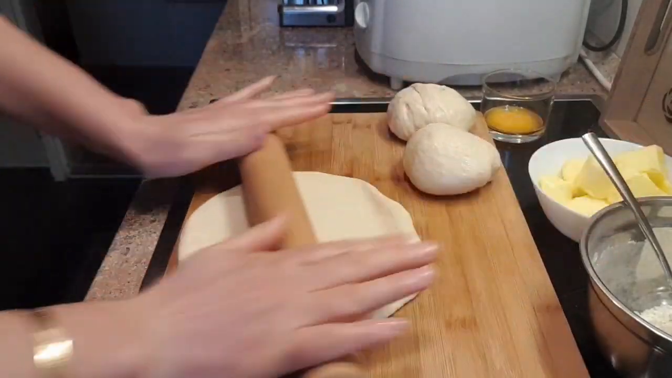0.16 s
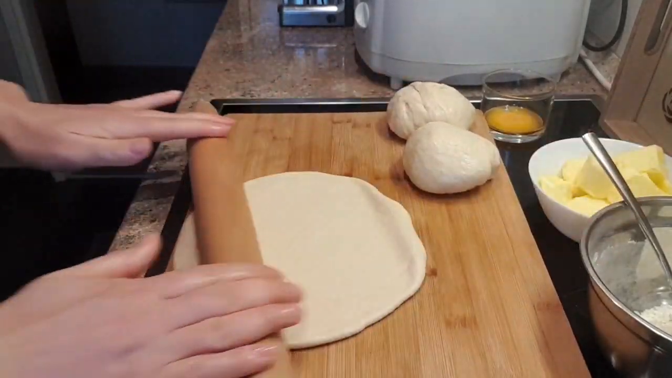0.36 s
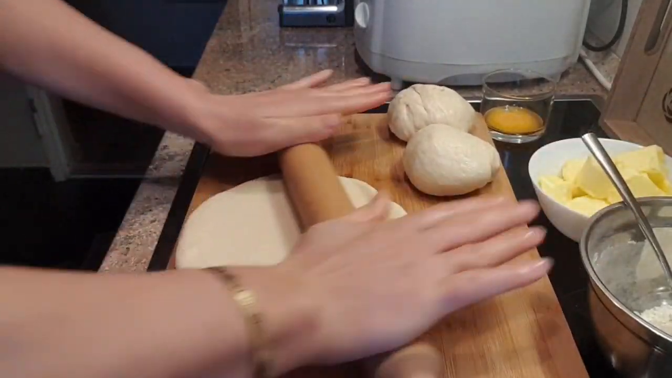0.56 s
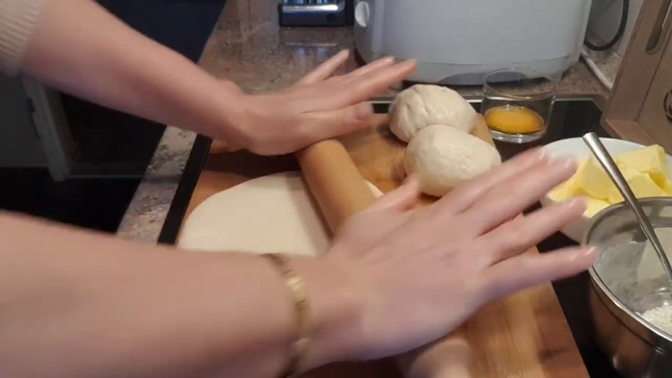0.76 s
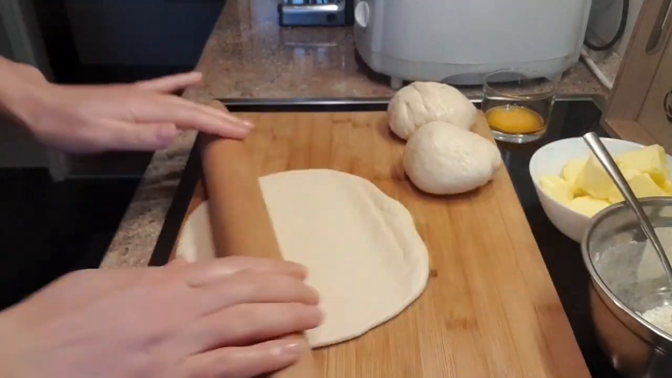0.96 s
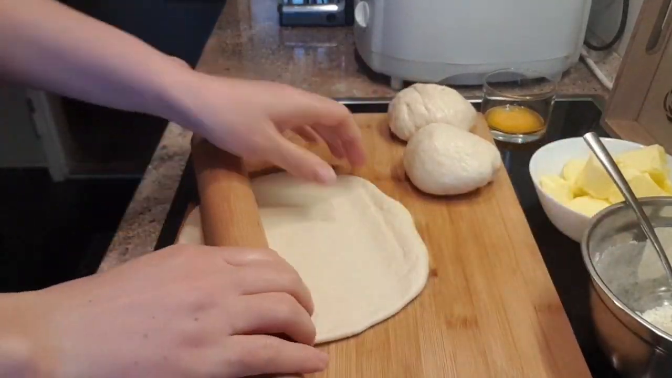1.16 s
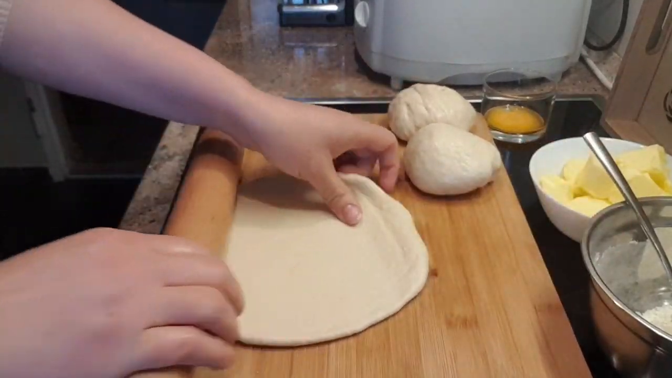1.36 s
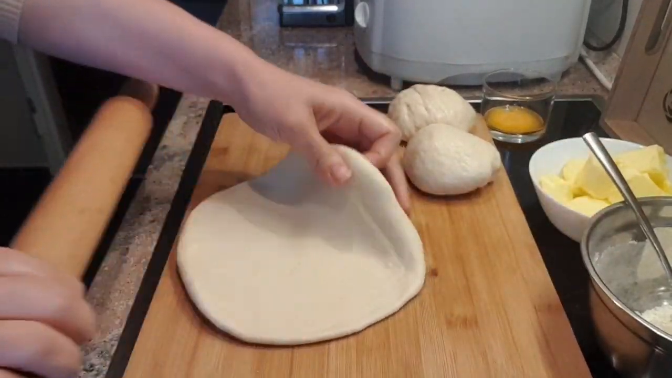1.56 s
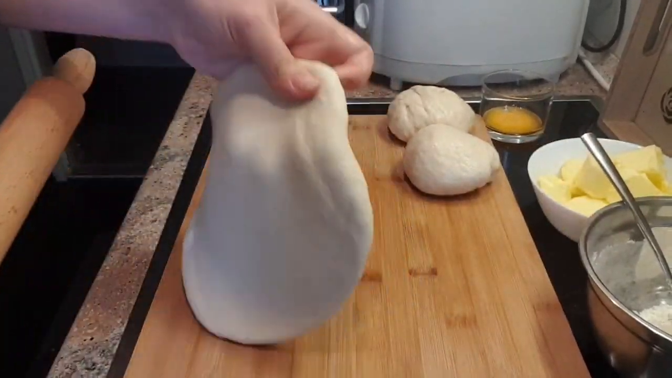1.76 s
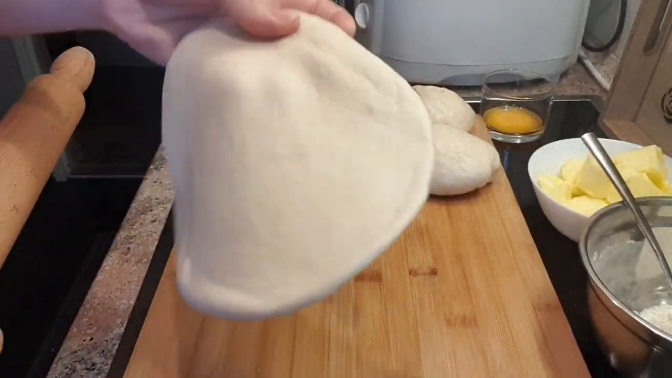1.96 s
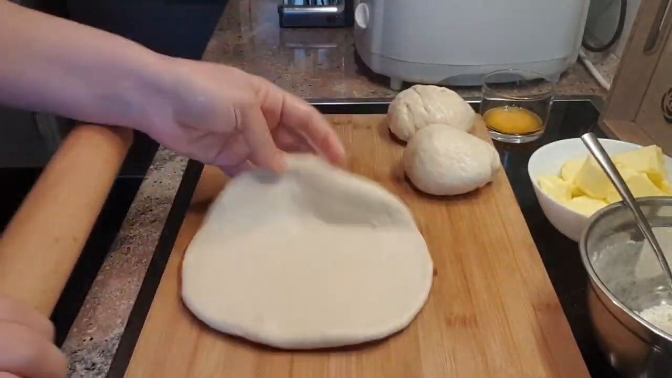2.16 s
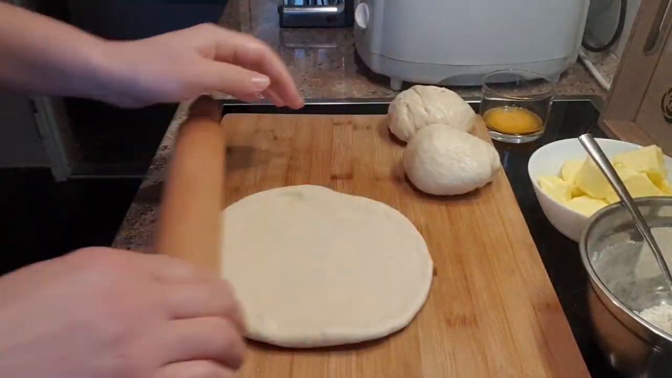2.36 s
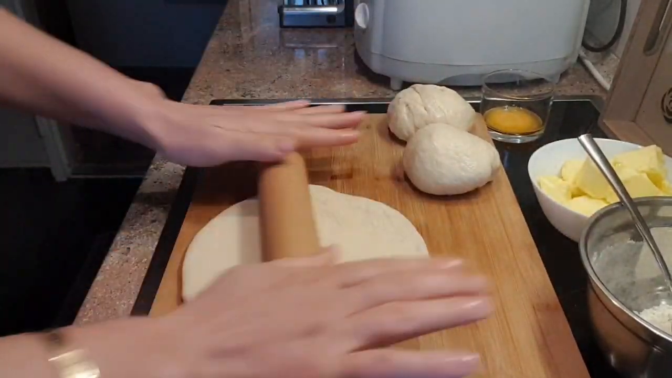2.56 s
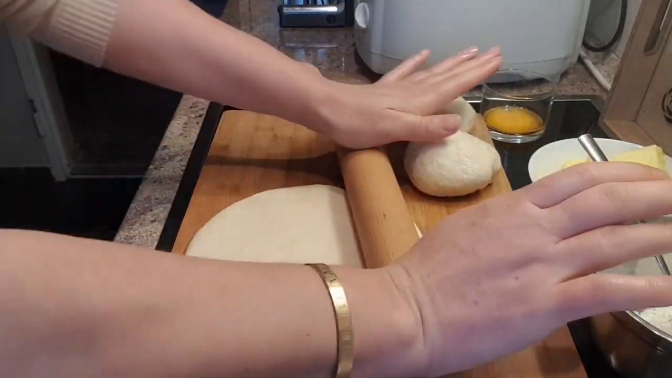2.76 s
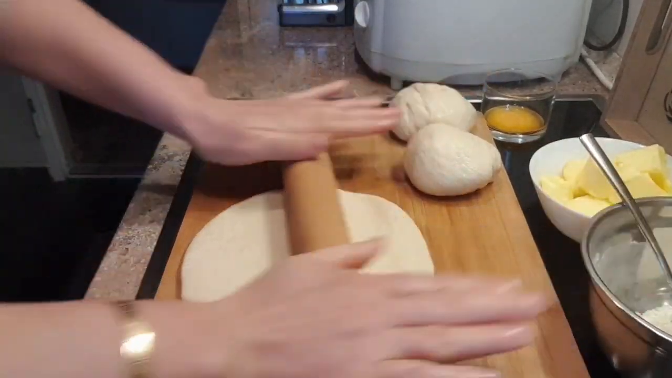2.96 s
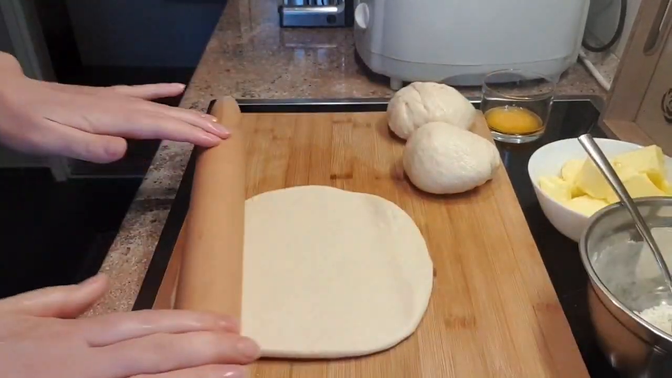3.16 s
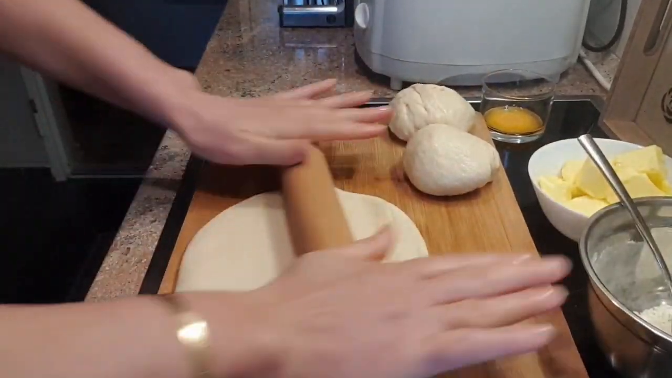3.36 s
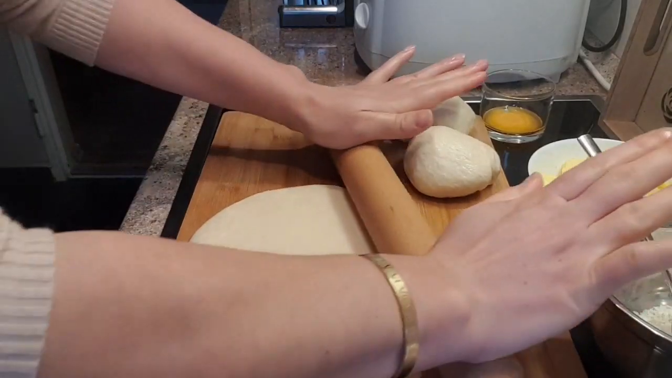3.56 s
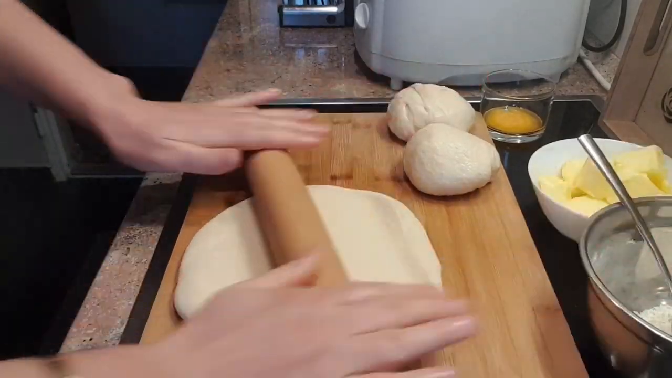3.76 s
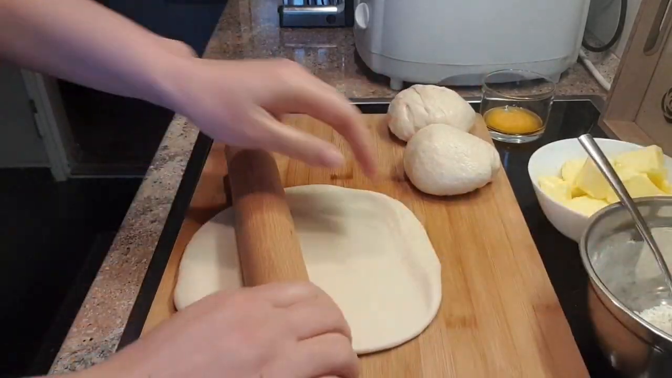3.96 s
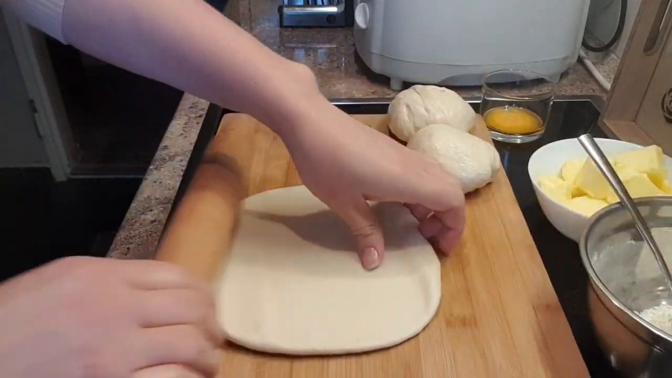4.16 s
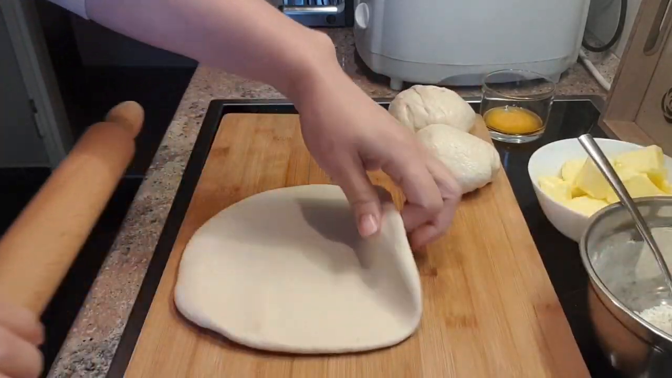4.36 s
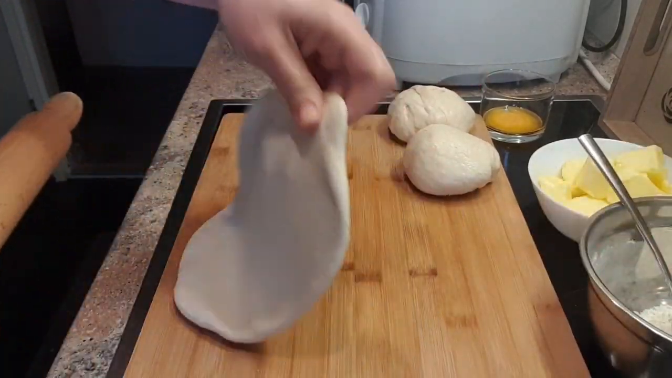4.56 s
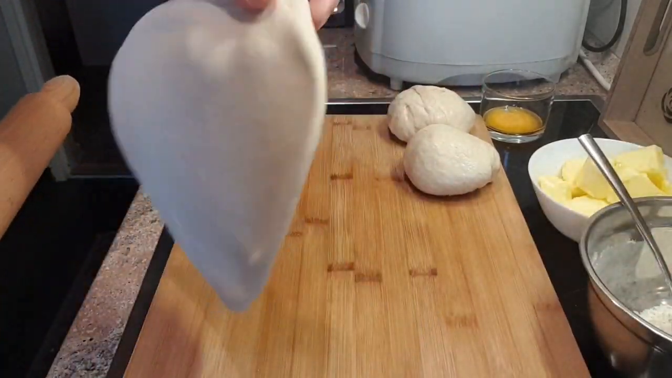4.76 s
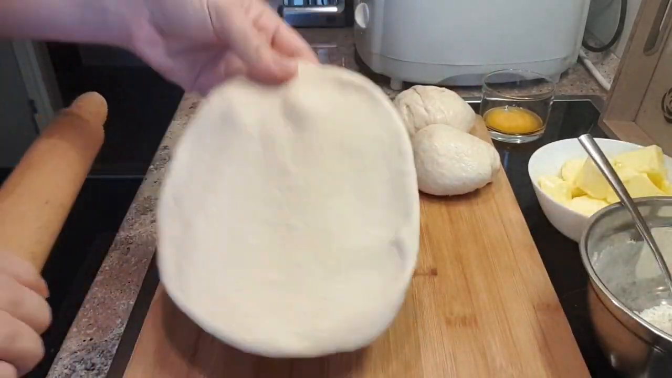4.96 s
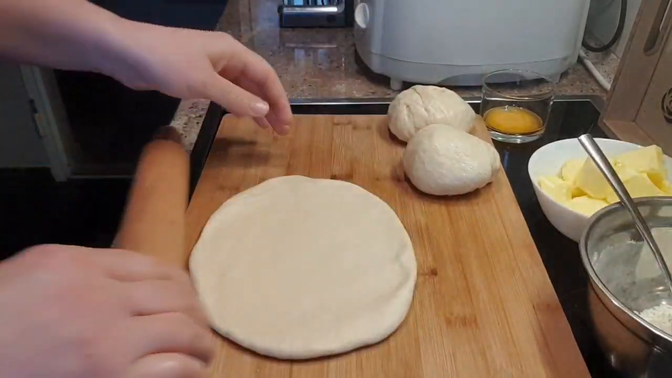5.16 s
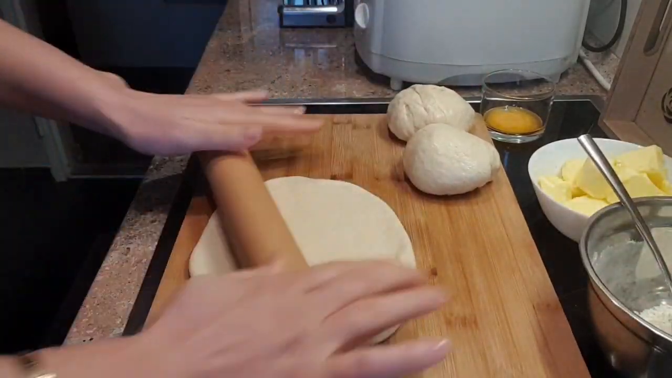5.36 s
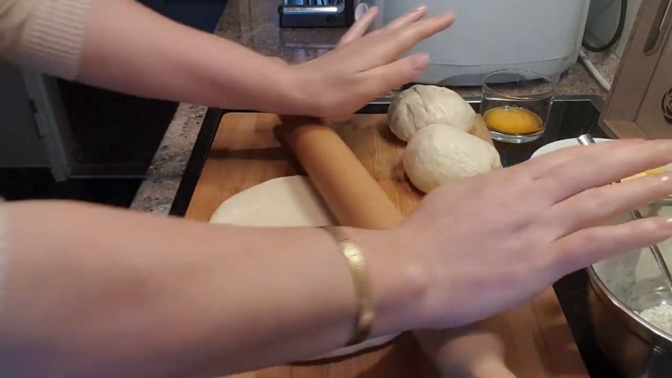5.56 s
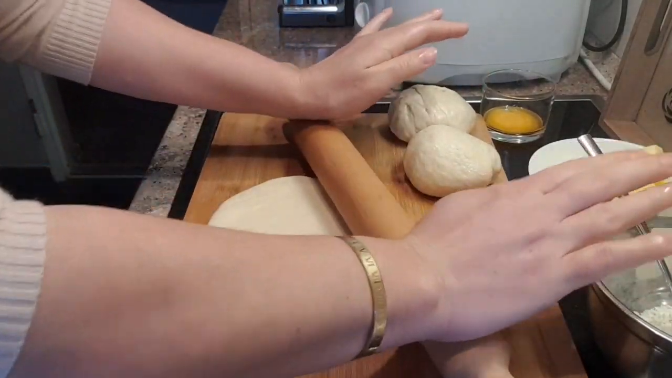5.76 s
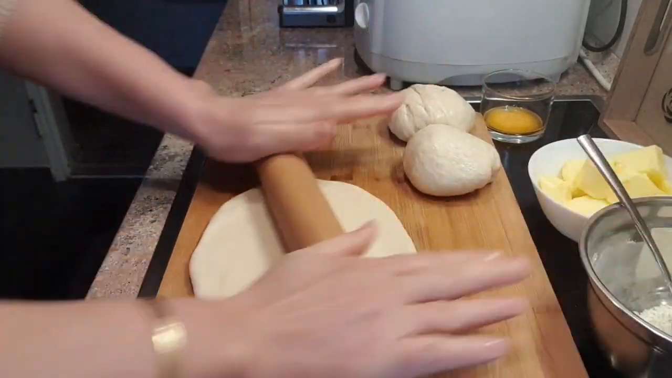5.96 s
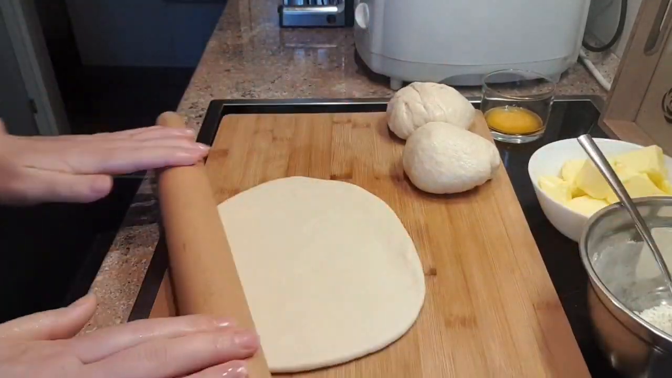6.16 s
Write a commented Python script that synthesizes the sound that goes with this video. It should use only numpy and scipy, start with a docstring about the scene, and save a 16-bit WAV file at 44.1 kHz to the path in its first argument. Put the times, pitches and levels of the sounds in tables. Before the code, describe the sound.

A wooden rolling pin rumbles over dough on a board, with sticky peeling, a soft slap and a few sharp wooden knocks.

```python
"""A small, still kitchen, a stereo pair close to a floured board. A wooden rolling pin runs to and fro
over dough: the board rumbles and crushed flour hisses. At 1.3 s the dough is peeled off with a sticky
hiss, turned and slapped down, and the rolling goes on. After 4.2 s it is peeled and slapped down again.
The pin is set back with a knock, thuds as it drops off the dough's edge and makes its last strokes."""
import sys
import numpy as np
from scipy import signal
from scipy.fft import rfft, irfft, next_fast_len
from scipy.io import wavfile
from scipy.ndimage import uniform_filter1d

SR = 44100
rng = np.random.default_rng(int(sys.argv[2]) if len(sys.argv) > 2 else 0)


def generate_wav(signal):
    """Clip the signal to [-1, 1] and save it as 16-bit WAV at the path in sys.argv[1]."""
    frames = np.transpose(np.atleast_2d(signal))
    scaled = np.clip(frames, -1, 1) * 32767
    pcm = np.round(scaled).astype(np.int16)
    wavfile.write(sys.argv[1], SR, pcm)


N = 277389

# deep modes of the worktop: pitch_hz, level_db, t60_s
WORKTOP_MODES = [(53.1, -4, 0.31), (78.7, 3, 0.26), (102.4, -2, 0.18), (118.2, -17, 0.28)]
# modes of the board lying on it: pitch_hz, level_db, t60_s
BOARD_MODES = [(159.7, -15, 0.33), (215.1, -1, 0.16), (237.4, -4, 0.21), (263, -6.5, .16), (274.5, 1, 0.11),
               (306.4, -0.5, 0.25), (382, -5.5, 0.19), (444, -6, 0.22)]


def gain_of(db):
    """Decibels to gain."""
    return 10 ** (np.asarray(db) / 20)


def unit_rms(x):
    """Scales to an rms of 1."""
    return x / np.sqrt(np.mean(x ** 2) + 1e-20)


def at_level(x, db):
    """Scales a short sound so that its energy per channel, spread over 30 ms, has the given level."""
    energy = np.sum(x ** 2, axis=-1).mean()
    return x * gain_of(db) * np.sqrt(.03 * SR / (energy + 1e-20))


def curve_at(points, hz):
    """Reads a curve on a log-frequency axis."""
    point_hz, value = np.transpose(points)
    return np.interp(np.log(hz + 1), np.log(point_hz + 1), value)


def add(mix, start_s, sound):
    """Mixes a stereo sound in at a time."""
    part = mix[:, max(round(start_s * SR), 0):][:, :sound.shape[1]]
    part += sound[:, :part.shape[1]]


def colour(x, spectrum, size=4096):
    """Minimum-phase filter with the given spectrum."""
    log_gain = np.log(gain_of(curve_at(spectrum, abs(np.fft.fftfreq(size, 1 / SR)))))
    impulse = np.fft.ifft(np.exp(np.conj(signal.hilbert(log_gain)))).real[:size // 2]
    return signal.fftconvolve(x, np.array(impulse, ndmin=x.ndim), axes=-1)[..., :x.shape[-1]]


def soften(x, hz, order=2):
    """Passes less treble above a corner."""
    return signal.sosfilt(signal.butter(order, min(hz, SR / 2 - 500), fs=SR, output="sos"), x)


def strike(x, hardness_hz):
    """A softer contact lasts longer: it dulls the sound, and a few times higher up it excites nothing."""
    return soften(soften(x, hardness_hz), hardness_hz * 3.5, order=5)


def ring(modes, rise_s, sign=1):
    """A body answers a blow; with a negative sign, neighbouring modes swing against each other."""
    t = np.arange(SR // 2) / SR
    swings = [sign ** k * gain_of(db - 60 * t / t60) * np.sin(2 * np.pi * hz * t)
              for k, (hz, db, t60) in enumerate(modes)]
    return -np.expm1(-t / rise_s) * sum(swings)  # a heavy body takes a moment to get going


def grains(per_s, spread_db):
    """Random tiny impulses; the wider the spread, the more a few stand out."""
    size = gain_of(spread_db * np.minimum(rng.exponential(1, N), 4))
    return size * rng.choice([-1., 1.], N) * (rng.random(N) < per_s / SR)


def room_tone(air_db=-62.5, shared_below_hz=600, whine_hz=7290, whine_width_hz=360, whine_db=-92):
    """Still air, alike at both microphones in the bass, with a faint narrow hiss high up."""
    # spectrum of the kitchen air: frequency_hz, gain_db
    air_spectrum = [(20, -5.5), (50, -19), (95, 5), (200, 1.5), (330, -4.5), (450, -13.5), (1100, -17.5),
                    (1450, -27), (2000, -22.5), (3200, -30), (6000, -35.5), (9000, -37), (12500, -32.5),
                    (15500, -33.5)]
    mid, side = rng.standard_normal((2, N))
    side = signal.sosfilt(signal.butter(1, shared_below_hz, "highpass", fs=SR, output="sos"), side)
    air = colour(np.array([mid + side, mid - side]), air_spectrum)
    edges_hz = [whine_hz - whine_width_hz / 2, whine_hz + whine_width_hz / 2]
    band = signal.butter(2, edges_hz, "bandpass", fs=SR, output="sos")
    whine = signal.sosfilt(band, rng.standard_normal((2, N)))
    return gain_of(air_db) * unit_rms(air) + gain_of(whine_db) * unit_rms(whine)


def kitchen_echoes(build_s=0.0018):
    """Echoes from cupboards and walls for one spot on the board, each band dying at its own speed."""
    # reverberation time: frequency_hz, t60_s
    decay_times = [(100, 1.5), (300, 0.3), (1000, 0.4), (3000, 0.32), (6000, 0.27), (14000, 0.18)]
    # colour of the echoes: frequency_hz, gain_db
    echo_spectrum = [(40, -28.5), (170, -13), (340, -9), (700, -4), (1500, -1.5), (4000, -1.5), (8000, -5),
                     (15000, -1.5)]
    hz, t, bands = signal.stft(rng.standard_normal((2, SR // 2)), SR, nperseg=256)
    t60 = curve_at(decay_times, hz)[:, None]
    decay = 1000 ** (-t / t60) * np.sqrt(2 * np.log(1000) / (t60 * SR))  # equal energy in each band
    bands = bands * decay * gain_of(curve_at(echo_spectrum, hz))[:, None]
    tails = signal.istft(bands, SR, nperseg=256)[1][:, :SR // 2]
    return tails * -np.expm1(-np.arange(SR // 2) / SR / build_s)


def in_kitchen(x, wet_db):
    """A sound on the board reaches both microphones directly and by way of the walls."""
    return x + gain_of(wet_db) * signal.oaconvolve(x[None], kitchen_echoes(), axes=1)[:, :len(x)]


def stereo_pair(x, left_lead_s=8e-5):
    """The two microphones differ a little in colour, and the sound reaches the left one first."""
    # balance of the pair: frequency_hz, left_minus_right_db
    balance = [(60, 3), (250, -0.5), (1000, -1), (4000, 1.5), (8000, 1), (14000, 3)]
    size = next_fast_len(N + SR // 4)
    hz = np.fft.rfftfreq(size, 1 / SR)
    left = gain_of(curve_at(balance, hz) / 2) * np.exp(1j * np.pi * hz * left_lead_s)
    return irfft(rfft(x, size) * np.array([left, 1 / left]), size)[:, :N]


def contact_burst(fade_s, width=0.71, crack=0.31):
    """A first contact and a cluster of tiny ones die into the room, a little unlike at each microphone."""
    fade = np.exp(-np.arange(SR // 2) / SR / fade_s)
    cluster = (rng.choice([-1., 1.], len(fade)) + width * rng.standard_normal((2, len(fade)))) * fade
    cluster /= np.linalg.norm(cluster[0])
    cluster[:, 0] += crack * np.exp(-fade_s / 0.0051)  # only a brief contact starts with a crack
    return cluster + kitchen_echoes()


def light_taps():
    """Taps and scuffs of fingers, pin and dough, too light to move the board, and the lingering clack of the
    pin's drop near 5.84 s."""
    # small contacts: start_s, level_db, fade_s
    taps = [(1.347, -57, 0.0051), (1.365, -55.5, 0.011), (1.409, -59, 0.053), (1.421, -61.5, 0.009),
            (4.182, -77, 0.0042), (4.302, -59.5, 0.0093), (4.339, -59.5, 0.014), (4.372, -60.5, 0.022),
            (5.84, -57.5, 0.075)]
    # their colour: frequency_hz, gain_db
    tap_spectrum = [(300, -10), (750, 4.5), (1000, 8), (1600, 3), (2050, -8), (3400, -10), (4500, -23),
                    (9000, -26)]
    out = np.zeros((2, N))
    for start_s, level_db, fade_s in taps:
        add(out, start_s, at_level(colour(contact_burst(fade_s), tap_spectrum), level_db))
    return out


def dough_peeling(trim_db=-6.5, drag_power=1.42, let_go_s=0.015):
    """Countless small bonds let go as the dough is dragged off the board, ever faster until it is free."""
    # tugs and peels: start_s, full_drag_s, free_s, relative_db
    peels = [(1.322, 1.883, 1.905, -51.5), (4.247, 4.32, 4.36, -60.5), (4.377, 4.66, 4.775, -51.5)]
    # colour of the sticky hiss: frequency_hz, gain_db
    sticky_spectrum = [(300, -13), (1000, -4.5), (2000, -10), (3200, -9.5), (5000, -6), (7000, -1.5),
                       (10000, 0), (12500, -0.5), (15500, -2.5)]
    t, envelope = np.arange(N) / SR, np.zeros(N)
    for start_s, full_drag_s, free_s, relative_db in peels:
        drag = np.interp(t, [start_s, full_drag_s], [0, 1])
        release = np.exp(-np.maximum(t - free_s, 0) / let_go_s)
        envelope += gain_of(relative_db) * drag ** drag_power * release
    hiss = unit_rms(colour(grains(per_s=17000, spread_db=2.5), sticky_spectrum))
    return gain_of(trim_db) * hiss * envelope


def slaps_and_clicks():
    """Short bright noise bursts: dough slaps, finger clicks and scuffs, and the crack of the pin's knock."""
    # bright contacts: start_s, level_db, fade_s, brightness_hz
    bursts = [(2.301, -58, 0.006, 2490), (2.3084, -37, 0.0069, 13600), (2.3132, -29.5, 0.0047, 10200),
              (2.592, -52, 0.064, 1800), (2.622, -55.5, 0.033, 2540), (4.264, -59, 0.031, 15100),
              (4.36, -57, 0.041, 3560), (5.2016, -36.5, 0.0018, 9900), (5.2361, -43, 0.0048, 11600),
              (5.3612, -37.5, 0.0021, 3000)]
    # their colour: frequency_hz, gain_db
    burst_spectrum = [(200, -6), (600, 0.5), (1500, -5), (2500, -5), (4500, -3), (7000, -6.5),
                      (12000, -4.5), (16000, -8.5)]
    out = np.zeros((2, N))
    for start_s, level_db, fade_s, brightness_hz in bursts:
        burst = colour(contact_burst(fade_s), burst_spectrum)
        add(out, start_s, at_level(soften(burst, brightness_hz), level_db))
    return out


def rim_bumps(hardness_hz=298):
    """Pin or hand presses over the dough's rim; it cushions them, so only worktop and board answer."""
    # soft bumps: start_s, worktop_boom_db, board_thud_db
    bumps = [(0.002, -46.5, -60.5), (0.154, -49, -65), (0.276, -42.5, -55.5), (0.368, -45.5, -62),
             (0.604, -45, -64), (0.981, -41.5, -57), (1.061, -43.5, -65.5), (3.154, -47, -70),
             (3.235, -47, -58.5), (3.419, -47.5, -61), (3.876, -42.5, -61), (4.305, -53.5, -60),
             (6.213, -46.5, -52.5)]
    out = np.zeros((2, N))
    worktop = strike(ring(WORKTOP_MODES, rise_s=0.0037), hardness_hz)
    board = strike(ring(BOARD_MODES, rise_s=0.004, sign=-0.76), hardness_hz)
    for start_s, boom_db, thud_db in bumps:
        add(out, start_s, at_level(worktop, boom_db) + in_kitchen(at_level(board, thud_db), wet_db=2))
    return out


def board_knocks():
    """Pin or dough lands: each blow booms in the worktop, thuds in the board, rings the wood and clacks."""
    # blows: start_s, boom_db, thud_db, ring_db, clack_db, clack_fade_s, hardness_hz
    blows = [(1.353, -42, -56, -59.5, -56.5, 0.011, 690), (2.308, -27, -34.5, -27, -28, 0.022, 1490),
             (2.596, -18, -46, -76, -41.5, 0.082, 198), (2.627, -30, -47.5, -74, -62, 0.022, 90.5),
             (2.906, -30.5, -37, -59, -40, 0.027, 484), (5.190, -54, -48, -37.5, -36.5, 0.0036, 770),
             (5.202, -35.5, -50, -39.5, -33, 0.014, 1300), (5.2358, -34.5, -48, -24.5, -32, 0.0056, 2550),
             (5.362, -23, -24, -33, -29.5, 0.0053, 1440), (5.46, -26, -62, -75, -35.5, .02, 97),
             (5.494, -37, -55.5, -70.5, -51, 0.015, 100), (5.836, -33.5, -37.5, -56, -42, 0.03, 810)]
    # higher, wooden modes of board and pin: pitch_hz, level_db, t60_s
    wood_modes = [(691, -14, 0.089), (759, -5.5, 0.11), (851, -9.5, 0.14), (881.5, -2, 0.13),
                  (908, 4.5, 0.049), (985, -8.5, 0.18), (1087, -5.5, 0.15), (1144, -7, .12),
                  (1301, -13, 0.13), (1562, 1, 0.031), (1623, -9.5, 0.028), (1994, -2, 0.032),
                  (2930, 1.5, 0.024)]
    # colour of the clack: frequency_hz, gain_db
    clack_spectrum = [(100, -6), (250, -3), (500, -2), (900, -2.5), (1400, -7), (2000, -7), (3200, -0.5),
                      (5000, -8), (8000, -5.5), (15000, -5.5)]
    out = np.zeros((2, N))
    worktop, wood = ring(WORKTOP_MODES, rise_s=0.005), ring(wood_modes, rise_s=0.0006)
    board = ring(BOARD_MODES, rise_s=0.0021, sign=-0.87)
    for start_s, boom_db, thud_db, ring_db, clack_db, clack_fade_s, hardness_hz in blows:
        boom = at_level(strike(worktop, hardness_hz), boom_db)  # close to the microphones, so dry
        thud = at_level(strike(board, hardness_hz * 0.36), thud_db)  # the board feels only the slow push
        ringing = at_level(strike(wood, hardness_hz), ring_db)
        add(out, start_s, boom + in_kitchen(thud, wet_db=-7.5) + in_kitchen(ringing, wet_db=-2))
        clack = colour(contact_burst(clack_fade_s), clack_spectrum)
        add(out, start_s, at_level(strike(clack, hardness_hz), clack_db))
    return out


def handling_gains(ease_s=0.053):
    """Rumble and rub gains of quiet handling; the rubbing stops while the dough hangs in the air."""
    # stretches of handling: start_s, end_s, rumble_db, rub_db
    stretches = [(0, 1.92, -60.5, -69.5), (1.95, 2.45, -57, -81), (2.40, 4.1, -60.5, -73),
                 (3.95, 4.36, -63.5, -70), (4.55, 5.02, -66.5, -79), (5.55, 6.29, -59.5, -74)]
    t, gains = np.arange(N) / SR, np.zeros((2, N))
    for start_s, end_s, *levels_db in stretches:
        eased = np.clip(.5 + np.minimum(t - start_s, end_s - t) / ease_s, 0, 1)
        gains += gain_of(levels_db)[:, None] * eased
    return gains


def stroke_gains(flour_power=1.74, rumble_power=2.2, rub_power=2.26):
    """Flour, rumble and rub gains grow as powers of the pin's speed, from rest to rest in each stroke."""
    # one-way strokes, relative levels: start_s, fastest_s, end_s, flour_db, rumble_db, rub_db
    strokes = [(0.108, 0.357, 0.49, -65.5, -52, -64), (0.47, 0.634, 0.92, -69, -48.5, -63.5),
               (0.874, 1.048, 1.22, -65, -49, -64), (2.36, 2.53, 2.8, -72, -55, -71.5),
               (2.56, 2.77, 2.93, -72, -51, -70.5), (2.994, 3.20, 3.316, -67, -52.5, -70.5),
               (3.315, 3.445, 3.7, -71, -53, -70.5), (3.718, 3.914, 4.07, -68, -50.5, -71.5),
               (4.104, 4.17, 4.25, -77.5, -62, -65.5), (5.30, 5.417, 5.6, -70.5, -51, -68),
               (5.498, 5.644, 5.75, -70.5, -59, -75), (5.947, 6.194, 6.4, -66, -54.5, -71)]
    powers = np.array([flour_power, rumble_power, rub_power])[:, None]
    t, gains = np.arange(N) / SR, np.zeros((3, N))
    for start_s, fastest_s, end_s, *levels_db in strokes:
        speed = abs(np.sin(np.interp(t, [start_s, fastest_s, end_s], [0, np.pi / 2, np.pi])))
        gains = np.hypot(gains, gain_of(levels_db)[:, None] * speed ** powers)
    return gains


def rolling_pin(board_db=-9, rub_trim_db=1, flour_trim_db=1):
    """Lumps in the dough jog board and worktop; hands rub the pin; flour grains are crushed under it."""
    # colour of palms on wood: frequency_hz, gain_db
    rub_spectrum = [(100, -11.5), (220, 9), (330, 6), (480, -0.5), (1000, -4), (1600, -15), (2500, -20.5),
                    (5000, -23.5), (15000, -47.5)]
    # colour of crushed flour: frequency_hz, gain_db
    flour_spectrum = [(300, -26), (1000, -3.5), (2000, -0.5), (3200, -4.5), (5000, -2.5), (7000, 1.5),
                      (10000, 2), (13000, -1.5), (15500, -5.5)]
    lumps = soften(grains(per_s=110, spread_db=1.0), hz=142)
    response = ring(WORKTOP_MODES, rise_s=0.0036) + gain_of(board_db) * ring(BOARD_MODES, rise_s=0.01)
    rumble = unit_rms(signal.oaconvolve(lumps, response)[:N])
    rumble /= np.sqrt(abs(uniform_filter1d(rumble ** 2, size=3000)) + 1e-6)  # evens out chance swells
    rub = unit_rms(colour(grains(per_s=2900, spread_db=0), rub_spectrum))
    flour = unit_rms(colour(grains(per_s=17000, spread_db=4.5), flour_spectrum))
    stroke_flour, stroke_rumble, stroke_rub = stroke_gains()
    handling_rumble, handling_rub = handling_gains()
    return (rumble * np.hypot(stroke_rumble, handling_rumble)
            + rub * np.hypot(gain_of(rub_trim_db) * stroke_rub, handling_rub)
            + flour * gain_of(flour_trim_db) * stroke_flour)


def scene():
    """The work on the board as the pair hears it, over the still air of the kitchen."""
    contacts = board_knocks() + rim_bumps() + slaps_and_clicks() + light_taps()
    rolling_and_peeling = in_kitchen(rolling_pin() + dough_peeling(), wet_db=6.5)
    return stereo_pair(contacts + rolling_and_peeling) + room_tone()


def record(dry):
    """The microphones drop the deepest bass and the highest treble."""
    low_cut_hz, high_cut_hz = 37, 15600
    thinned = signal.sosfilt(signal.butter(3, low_cut_hz, "highpass", fs=SR, output="sos"), dry)
    high_cut = signal.firwin(301, high_cut_hz, window=("kaiser", 9), fs=SR)
    return signal.oaconvolve(thinned, high_cut[None], "same")


dry = scene()
out = record(dry)
generate_wav(out)
```